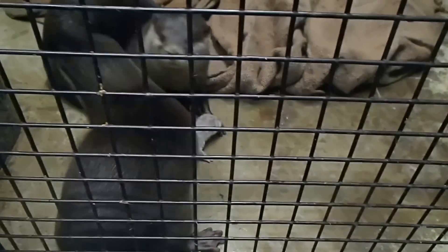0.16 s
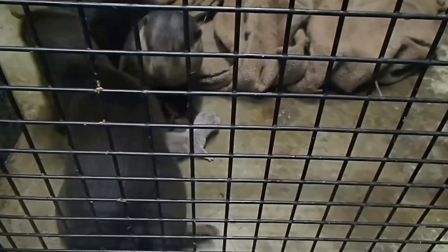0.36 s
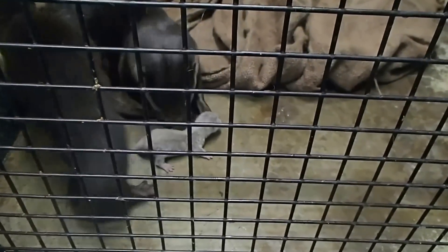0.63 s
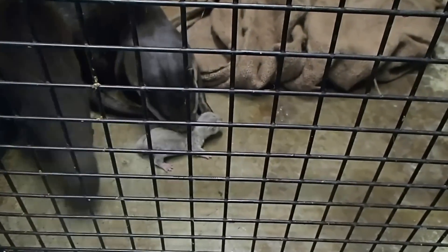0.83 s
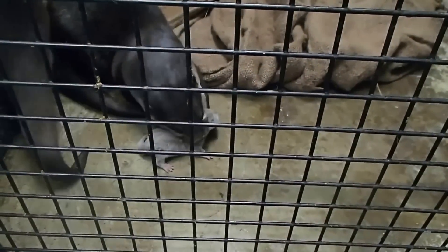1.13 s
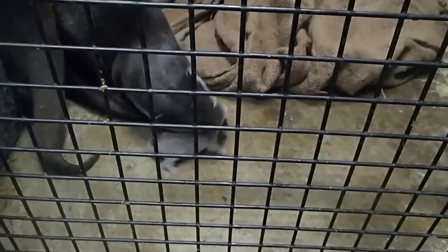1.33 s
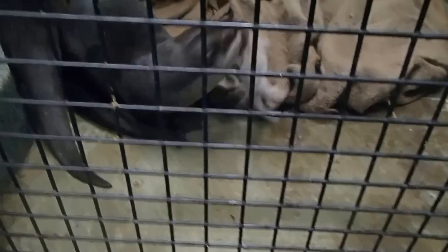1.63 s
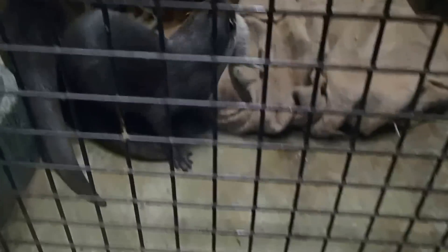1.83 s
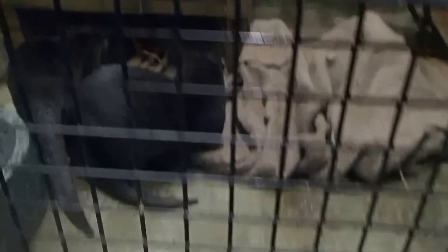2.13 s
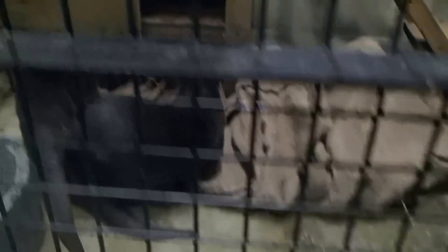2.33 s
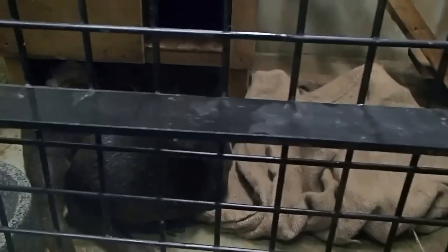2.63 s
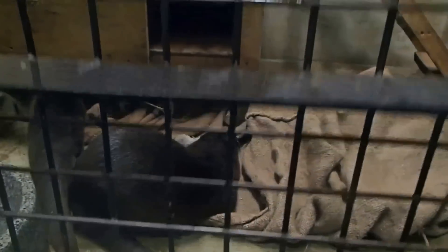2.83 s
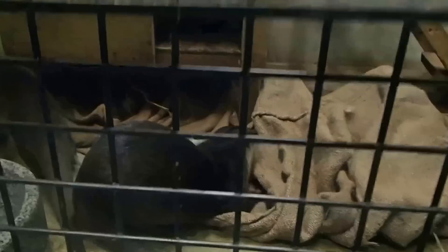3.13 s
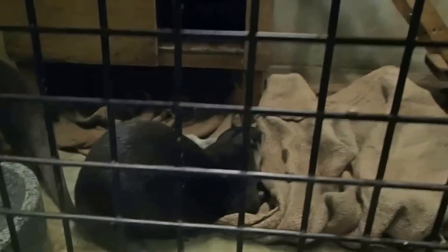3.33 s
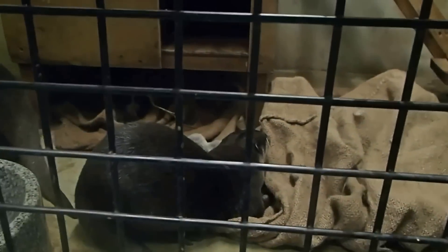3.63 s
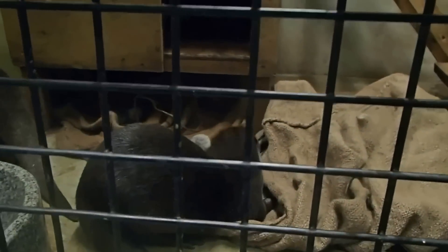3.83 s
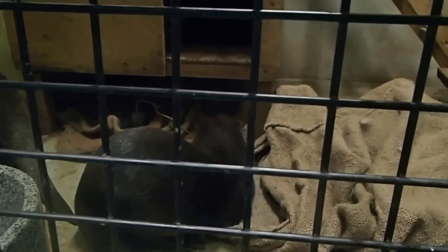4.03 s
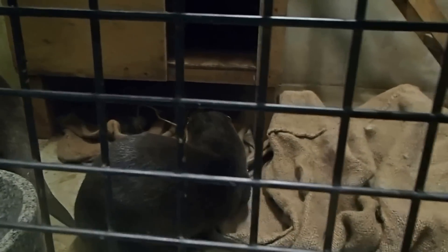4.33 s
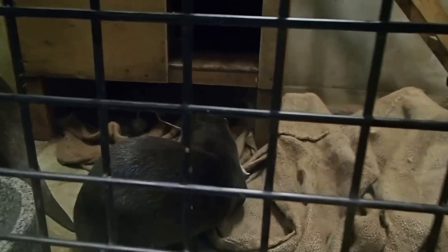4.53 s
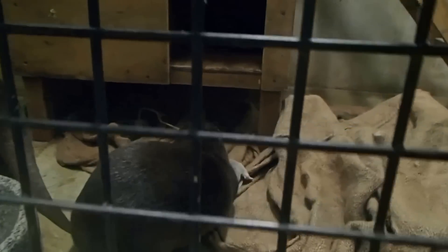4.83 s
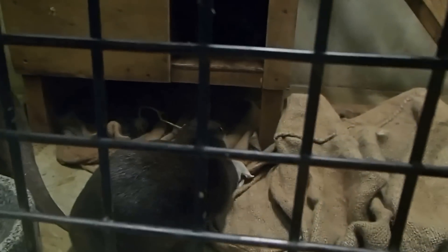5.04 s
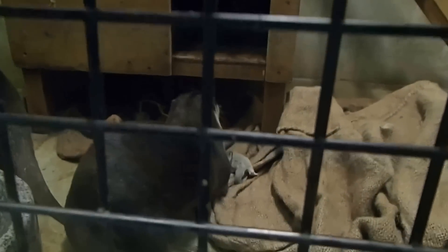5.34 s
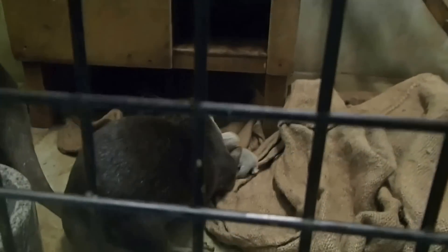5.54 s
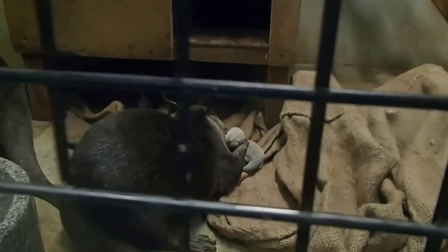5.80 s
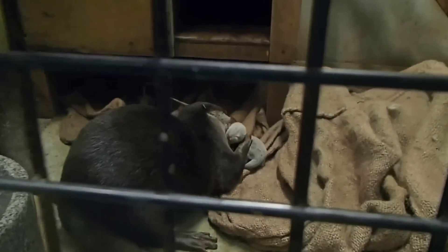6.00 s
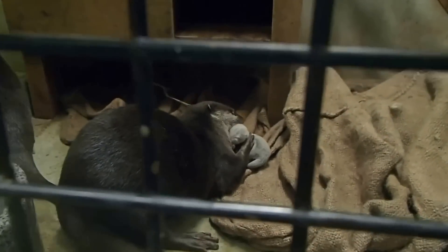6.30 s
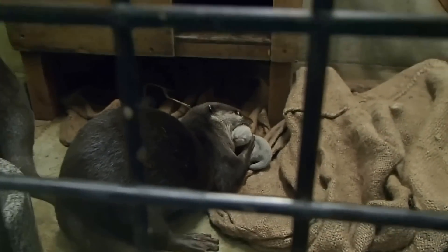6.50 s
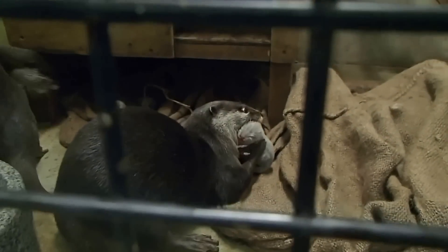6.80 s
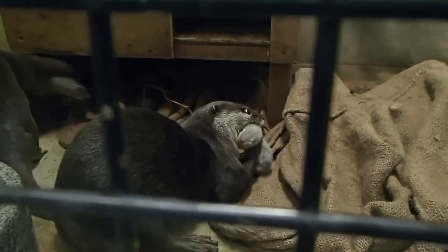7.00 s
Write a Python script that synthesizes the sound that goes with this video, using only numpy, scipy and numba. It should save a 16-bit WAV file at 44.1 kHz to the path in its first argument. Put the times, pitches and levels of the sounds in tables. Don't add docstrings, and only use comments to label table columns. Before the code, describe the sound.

Otters squeal in shrill, breaking whistles and reedy wails in a small concrete den, while a metal gate squeaks, clicks and slams with a rattle.

```python
import sys
import numpy as np
from scipy import signal
from scipy.fft import rfft, irfft, next_fast_len
from scipy.io import wavfile
from scipy.ndimage import uniform_filter1d, minimum_filter1d
from numba import njit

SR = 44100
rng = np.random.default_rng(int(sys.argv[2]) if len(sys.argv) > 2 else 0)


def natural_amplitude(level_db):
    exponent = np.asarray(level_db, float) / 20
    return 10 ** exponent


def transcribe(u):
    v = np.clip(np.atleast_2d(u).T, -1, 1)
    q = np.round(v * 32767).astype(np.int16)
    wavfile.write(sys.argv[1], SR, q)


N = 315756
TIME_S = np.arange(N) / SR

# freq_hz, level_db
VENT_SPECTRUM = [(24, -37), (40, -4), (138, 1.5), (210, -4.5), (387, -1), (549, -8.5), (780, -4),
                 (1050, -10.5), (1870, -10), (2600, -11), (3380, -63), (5720, -120)]
# freq_hz, level_db
MOTOR_HUM = [(61, -57), (134.6, -54)]

# start_s, length_s, pitch_hz, level_db
HINGE_SQUEAKS = [
    (2.088, 0.094, 2236, -33),
    (2.126, 0.068, 3070, -31),
    (2.134, 0.11, 2694, -33.5),
    (5.336, 0.018, 740, -41),
]
# start_s, level_db, tilt_db_per_octave
GATE_BLOWS = [
    (2.298, -26, -6.5),
    (2.632, -9, -0.5),
    (2.648, -23, -6),
    (2.685, -12, -3),
    (2.711, -12, -5),
    (2.742, -21, -7.5),
]
# freq_hz, level_db, t60_s
GATE_MODES = [(47.8, -23, 1.4), (61.65, -13, 2.2), (113.25, -8, 1.8), (183, -12.5, 1.55),
              (284.4, -7.5, 0.57), (396.8, -7, 1), (550, -9.5, 0.57), (590, -7, 0.45), (718, -2, 0.38),
              (899, -1.5, 0.35), (1240, -3, 0.5), (1760, -10, 0.37), (2060, -12, 0.27), (2390, -16, 0.27)]
# freq_hz, level_db
CRACK_SPECTRUM = [(24, -41), (40, -54), (201, -15), (275, -13), (326, -11), (538, -2.5), (623, -5.5),
                  (2440, -6.5), (6000, -17.5), (7800, -88), (13200, -120)]

# freq_hz, level_db
CHEST = [(800, -21), (1400, 2), (2200, -1), (3300, 12), (4300, 5), (5200, 4)]
# freq_hz, level_db
MOUTH = [(3800, -21.5), (5000, -5), (6400, 4.5), (7800, -2.5), (9200, -1), (11300, 6), (13000, -3.5),
         (15500, -10.5)]
# freq_hz, level_db
PIPE = [(2000, -30), (4000, -15), (5300, 3), (6200, -3), (7200, 1.5), (8000, -3), (9000, -2.5)]

# time_s, level_db, brightness_above_9khz_db
LITTER_LEVELS = [(0, -25, -2), (0.22, -27.5, -3.5), (0.42, -31.5, -6), (0.56, -20, 13), (0.71, -28, 22),
                 (0.85, -25.5, 11), (1.2, -25.5, -3), (1.5, -24.5, 0.5), (1.95, -27.5, 4),
                 (2.5, -23.5, -1.5), (3.45, -20, 3.5), (4.8, -28, 4.5), (5.45, -22.5, 2.5), (5.65, -34, -4),
                 (5.899, -21.5, 3.5), (6.38, -35.5, 24), (6.7, -25, -0.5), (7.16, -27.5, 0)]
# centre_s, half_width_s, change_db
LITTER_SURGES = [(0.72, 0.037, 11), (5.5, 0.075, -3), (5.53, 0.068, -2), (4, 0.056, -4), (6.73, 0.03, 9),
                 (2.73, 0.08, -0.5), (3.8, 0.042, 3), (3.03, 0.047, -13), (1.42, 0.034, -4),
                 (1.831, 0.053, -18.5), (1.36, 0.055, 2), (2.244, 0.096, 6.5), (2.36, 0.024, -1),
                 (2.3, .06, -5), (4.4, 0.03, 1), (4.31, 0.016, -5), (5.022, 0.036, 4.5), (6.85, 0.035, -6),
                 (0.35, 0.077, -2.5), (1.25, 0.052, -15), (6.6, .05, -12), (6.96, 0.039, -18),
                 (3.9, 0.048, -6)]

# time_s, pitch_hz, low_partials_db
SOBS = [
    [(0.0, 1105, -37), (0.06, 970, -40.5), (0.08, 893, -39.5), (0.108, 900, -39.5), (0.142, 826, -43.5),
     (0.17, 676, -41)],
    [(0.545, 1778, -40), (0.575, 1667, -43.5), (0.6, 1550, -44.5), (0.625, 1483, -43.5),
     (0.648, 1438, -43.5), (0.665, 1570, -35), (0.68, 1770, -46)],
    [(.66, 1658, -45), (.7, 1725, -40), (.75, 1590, -44)],
    [(0.735, 1635, -46), (0.759, 1356, -39.5), (0.849, 1092, -39.5), (0.999, 1028, -42.5),
     (1.087, 850, -45.5), (1.135, 899, -39.5)],
    [(2.35, 1590, -36.5), (2.42, 1680, -44), (2.465, 1760, -39), (2.5, 1396, -36.5), (2.53, 1760, -34.5),
     (2.582, 1425, -39), (2.596, 1660, -34), (2.632, 1780, -35)],
    [(4.36, 1795, -42), (4.4, 1342, -52.5), (4.44, 1290, -49), (4.48, 1300, -46), (4.51, 1113, -50.5),
     (4.56, 1008, -48), (4.645, 888, -50)],
    [(5.07, 1705, -41), (5.11, 1545, -46), (5.15, 1555, -45.5), (5.17, 1601, -46), (5.2, 1450, -49.5),
     (5.228, 1617, -47.5), (5.25, 1515, -48), (5.284, 1790, -50)],
    [(5.276, 1783, -41), (5.31, 1564, -51), (5.335, 1460, -47), (5.378, 1442, -47.5), (5.397, 1510, -50.5),
     (5.436, 1295, -52)],
    [(5.891, 2010, -39), (5.931, 1468, -40.5), (5.971, 1436, -39), (5.985, 1288, -37), (6.039, 1062, -39),
     (6.2, 901, -41)],
    [(6.1, 1760, -46), (6.16, 1690, -51), (6.232, 1597, -44.5), (6.247, 1480, -47), (6.28, 1463, -46.5),
     (6.304, 1547, -43.5), (6.316, 1408, -47), (6.365, 1395, -47), (6.46, 1298, -46)],
    [(6.555, 2136, -39), (6.598, 1480, -39.5), (6.622, 1594, -37.5), (6.648, 1403, -43), (6.68, 1203, -43),
     (6.72, 987, -41)],
]
# upper_over_lower_db, first_partial_db, upper_mouth_lift_db
SOB_VOICES = [(15.5, -7, .1), (16.7, -27, 1), (18.2, -21, -1.8), (14.7, -12, 3.3), (6.1, -6, -6),
              (19.6, 3, -4.5), (22.12, 5, 5.5), (21.97, 3, 1), (12.4, -9, -0.7), (13.6, 4, -9),
              (16.5, -23, 9)]
SOB_JITTER = (.005, .006, .07, .005, .016, .011, .005, .005, .012, .013, .005)
# start_s, length_s, from_hz, to_hz, low_partials_db
FACING_WAILS = [
    (3.0, 0.25, 1438, 1385, -54.5),
    (3.37, 0.39, 1864, 1031, -50),
    (4.2, 0.13, 1414, 1535, -55.5),
]
# start_s, length_s, from_hz, to_hz, low_partials_db
SIDE_WAILS = [(4.9, 0.095, 1200, 910, -62), (.982, 0.17, 1284, 1673, -47), (2.0, 0.32, 1850, 1290, -45.5),
              (3.085, 0.2, 1900, 1328, -44), (3.52, 0.33, 1890, 1556, -44.5), (3.77, 0.3, 1740, 1398, -46),
              (3.781, 0.11, 1108, 1250, -41), (4.6, 0.35, 1910, 1334, -48.5)]
# start_s, length_s, from_hz, to_hz, low_partials_db
AWAY_WAILS = [(.21, .08, 1500, 1650, -45), (0.37, .08, 1550, 1000, -54), (.42, 0.083, 1900, 1560, -53),
              (1.431, 0.17, 1558, 1590, -39.5), (1.49, 0.09, 1778, 1900, -38), (1.59, .1, 1640, 1750, -39),
              (2.4, .08, 1245, 1190, -36), (2.44, .09, 1950, 1500, -41.5), (1.8, 0.088, 1900, 2400, -43),
              (5.392, 0.29, 1775, 1230, -42), (1.15, 0.12, 1340, 1370, -48.5),
              (.528, 0.029, 2350, 2040, -37), (4.9, .1, 1350, 1400, -48), (4.5, 0.029, 1700, 2100, -39),
              (5.2, .085, 1800, 1900, -42), (5.83, 0.12, 1100, 930, -48), (7.04, .118, 1900, 1830, -35.5)]

# top_s, top_hz, climb_s, fall_s, level_db
OPEN_ARCHES = [
    (3.0, 8980, 0.055, 0.063, -21),
    (4.65, 9020, 0.048, 0.069, -23),
    (5.25, 8200, 0.033, 0.035, -26),
]
# top_s, top_hz, climb_s, fall_s, level_db
THIN_ARCHES = [(.87, 8450, 0.036, 0.055, -27), (1.594, 8900, 0.065, 0.066, -20),
               (2.17, 8270, 0.07, 0.068, -21.5), (2.055, 8820, 0.048, 0.071, -17.5),
               (2.735, 7910, 0.045, 0.069, -23), (2.83, 8400, 0.043, 0.063, -22.5),
               (3.19, 8000, .065, .09, -19), (3.305, 8770, 0.025, 0.082, -19),
               (4.6, 8380, 0.044, 0.071, -19.5)]
# top_s, top_hz, climb_s, fall_s, level_db
HELD_ARCHES = [
    (2.7, 8710, 0.031, 0.14, -31),
    (4.73, 8410, 0.015, 0.14, -20.5),
    (6.02, 8400, .012, 0.06, -25),
]
# start_s, length_s, from_hz, to_hz, level_db
SLIDES = [(.335, .055, 8800, 8400, -21.5), (.388, 0.038, 7600, 7400, -21), (2.095, 0.014, 3600, 6000, -31),
          (2.93, 0.021, 3200, 5700, -38), (3.4, .02, 4900, 7500, -33), (1.231, 0.013, 8800, 8740, -23),
          (6.86, 0.016, 3000, 7500, -38), (5.664, 0.019, 1500, 2700, -36.5), (2.3, 0.034, 6500, 7000, -26),
          (2.235, 0.027, 6700, 5600, -17.5), (2.11, .11, 5670, 4510, -29.5),
          (1.285, 0.059, 7600, 2500, -43.5), (2.78, 0.065, 6000, 3200, -45),
          (1.404, 0.05, 5060, 5380, -28.5), (1.8, 0.0167, 8500, 2900, -42), (1.712, 0.038, 7800, 1500, -42),
          (3.052, 0.034, 8300, 2400, -45), (4.4, .055, 8000, 8900, -28), (1.54, 0.084, 6370, 5700, -34),
          (2.769, 0.046, 7030, 6910, -18), (3.7, 0.035, 6000, 5700, -22), (3.435, 0.074, 4900, 5200, -30.5),
          (4.082, 0.11, 5600, 1900, -51), (4.885, .07, 5200, 3300, -51), (4.672, 0.029, 6200, 3300, -40),
          (5.1, 0.032, 3200, 1760, -49), (4.6, 0.16, 4900, 1910, -49.5), (5.4, 0.041, 6220, 5980, -22),
          (6.541, 0.03, 3900, 1900, -37.5)]
# start_s, length_s, from_hz, to_hz, level_db
HUMS = [(6.415, 0.084, 1278, 1312, -38), (3.685, 0.083, 1060, 1025, -46.5), (3.885, 0.036, 1356, 1343, -41),
        (6.72, 0.066, 1308, 1310, -46), (6.86, 0.077, 853, 1310, -45.5), (6.935, 0.096, 1298, 1346, -36)]
# time_s, pitch_hz, level_db
BREAKS = [
    [(.262, 5600, -21), (.283, 7900, -30), (.31, 8540, -23.5), (.335, 8640, -22.5), (.35, 8200, -25),
     (.385, 5900, -15)],
    [(.368, 2004, -32), (.38, 3010, -38), (.386, 5020, -19.5), (.4, 6440, -14), (.42, 8260, -20),
     (.452, 8450, -11.5), (.458, 7680, -12), (.478, 6970, -12.5), (.522, 5880, -18)],
    [(1.18, 8100, -30), (1.2, 8600, -26.5), (1.235, 8920, -19.5), (1.252, 8400, -33), (1.265, 7200, -16.5),
     (1.288, 5850, -24)],
    [(1.22, 5600, -37), (1.237, 8500, -31), (1.26, 9180, -29), (1.288, 9000, -26), (1.3, 7700, -23),
     (1.33, 6400, -18), (1.348, 6000, -16.5)],
    [(1.615, 6500, -18), (1.635, 8170, -22), (1.65, 8520, -24), (1.67, 7730, -17.5), (1.695, 6930, -17.5),
     (1.722, 5500, -35)],
    [(1.765, 7900, -25), (1.79, 8600, -24), (1.82, 8750, -22), (1.85, 8320, -21), (1.875, 7130, -18.5),
     (1.905, 5700, -26.5)],
    [(3.948, 8170, -26), (3.98, 8550, -21), (4.02, 8300, -25), (4.03, 7300, -17), (4.055, 6370, -18.5),
     (4.082, 5650, -29)],
    [(3.965, 5800, -17), (3.985, 6870, -20.5), (4.0, 8740, -23), (4.02, 8900, -15), (4.07, 8850, -22)],
    [(4.82, 5400, -28), (4.85, 7700, -23), (4.88, 8200, -21), (4.917, 8100, -20), (4.935, 7200, -16.5),
     (5.0, 5600, -23)],
    [(6.865, 5200, -24), (6.89, 7900, -23), (6.905, 8400, -24), (6.935, 8100, -19), (6.955, 6800, -21),
     (6.985, 5900, -18), (7.015, 5100, -27)],
]
# time_s, pitch_hz, level_db
FURTHER_BREAKS = [
    [(4.013, 6400, -38), (4.03, 8020, -20), (4.07, 8250, -15), (4.105, 8050, -22), (4.115, 7040, -18),
     (4.152, 6520, -18), (4.178, 5750, -27), (4.2, 5660, -23)],
    [(4.285, 5550, -26), (4.302, 6000, -20), (4.333, 5400, -31)],
    [(5.112, 8350, -29), (5.135, 8840, -24), (5.17, 8350, -31), (5.185, 6800, -27), (5.21, 5750, -23)],
    [(5.275, 6500, -22), (5.29, 6300, -20), (5.312, 5300, -25.5), (5.332, 5200, -25)],
    [(5.636, 8590, -19), (5.66, 8560, -16), (5.685, 8450, -20), (5.702, 8270, -17), (5.712, 7530, -18),
     (5.73, 7070, -18), (5.766, 5700, -22)],
    [(5.677, 4600, -25), (5.7, 7030, -28), (5.712, 7850, -28), (5.73, 8160, -20), (5.764, 7950, -24),
     (5.772, 7000, -16), (5.792, 5900, -19), (5.804, 6000, -23), (5.83, 5600, -32)],
    [(6.398, 1960, -34), (6.417, 3410, -34), (6.425, 5100, -19), (6.444, 6900, -12), (6.46, 7840, -17.5),
     (6.485, 8330, -18), (6.505, 7850, -14), (6.534, 6220, -16), (6.543, 5160, -36)],
    [(6.515, 8400, -32), (6.54, 8580, -24.5), (6.6, 8150, -27)],
    [(6.61, 7200, -22), (6.635, 7130, -18), (6.65, 6900, -22.5), (6.665, 6440, -21), (6.678, 6200, -24)],
]
# octave_db, roughness_ratio
BREAK_VOICES = [(-12, 1), (-3.5, 0.88), (-8, 0.84), (-8, 0.92), (-8, 0.48), (-10, 0.77), (0.5, 0.88),
                (-10, 1), (-6, 0.94), (-7, 1.3), (-1, 0.83), (4.5, .7), (-16, 1), (-16, 1), (-5.5, .6),
                (1, 0.78), (-1.5, 0.23), (-20, 0.67), (-16, 0.72)]


def shape(hz, table):
    f, db = np.transpose(table)
    return natural_amplitude(np.interp(np.log(hz + 1), np.log(f), db))


def colour(x, table):
    size = next_fast_len(len(x))
    hz = np.arange(size // 2 + 1) * SR / size
    return irfft(rfft(x, size) * shape(hz, table), size)[:len(x)]


def unit(x):
    return x / np.sqrt(np.mean(x ** 2))


def walk(size, rate_hz):
    k = max(int(SR / rate_hz), 1)
    return unit(uniform_filter1d(uniform_filter1d(rng.standard_normal(size), k), k))


def room(x, t60_s, wet_db, gap_s):
    t = np.arange(SR // 2) / SR
    tail = rng.standard_normal(len(t)) * natural_amplitude(-60 * t / t60_s) * (t > gap_s)
    tail = tail / np.sqrt(np.sum(tail ** 2))
    return x + natural_amplitude(wet_db) * signal.fftconvolve(x, tail)[:N]


def vent():
    hum = sum(natural_amplitude(db + 1.6 * walk(N, 8.7)) * np.sqrt(2) * np.sin(2 * np.pi * hz * TIME_S)
              for hz, db in MOTOR_HUM)
    rumble = unit(colour(rng.standard_normal(N), VENT_SPECTRUM))
    return rumble * natural_amplitude(-28.5 + 0.36 * walk(N, 25.0)) + natural_amplitude(15.5) * hum


def hinge():
    out, slip, waver = np.zeros(N), walk(N, 106), walk(N, 210)
    for start_s, length_s, hz, db in HINGE_SQUEAKS:
        end_s = start_s + length_s
        span = slice(int(start_s * SR), int(end_s * SR))
        t = TIME_S[span]
        edge = np.clip(np.minimum((t - start_s) / 0.0026, (end_s - t) / 0.014), 0, 1)
        phase = 2 * np.pi * hz * np.cumsum(1 + 0.021 * waver[span]) / SR
        out[span] += natural_amplitude(db + 2.0 * slip[span]) * edge * np.sin(phase)
    return out


def gate():
    out, t = np.zeros(N + SR), np.arange(SR) / SR
    boom_spectrum = [(45, -16), (110, -8.5), (300, -1.0), (600, -34)]
    for start_s, db, tilt_db in GATE_BLOWS:
        tilt = [(150, -1.6 * tilt_db), (500, 0.008), (8000, 4 * tilt_db)]
        crack = unit(colour(rng.standard_normal(SR), CRACK_SPECTRUM)) * natural_amplitude(-60 * t / 0.22)
        boom = natural_amplitude(-23.0) * unit(colour(rng.standard_normal(SR), boom_spectrum)) * natural_amplitude(-60 * t / 1.28)
        rings = sum(natural_amplitude(mode_db - 7.0) * np.sin(2 * np.pi * (hz * t + rng.random())) * natural_amplitude(-60 * t / t60_s)
                    for hz, mode_db, t60_s in GATE_MODES)
        blow = colour(crack + 0.43 * rings + boom, tilt)
        start = int(start_s * SR)
        out[start:start + SR] += natural_amplitude(db) * blow * np.minimum(3 - 3 * t, 1)
    return out[:N]


def litter():
    reeds, leaks = np.zeros(N), np.zeros(N)
    turn = 2 * np.pi * np.arange(4096) / 4096
    wave = sum(np.cos(k * turn + k * k) for k in range(1, 13))
    for top_hz, cries_per_s in ((1500, 2.3), (1750, 3.1), (1950, 2.7)):
        age = (np.cumsum(cries_per_s * natural_amplitude(3 * walk(N, 2))) / SR + rng.random()) % 1
        pitch_hz = top_hz * natural_amplitude(-4.5 * age ** .6 + .5 * walk(N, 30)) * (1 + .0095 * walk(N, 700))
        cycle = np.cumsum(pitch_hz) / SR % 1
        effort = natural_amplitude(2.5 * walk(N, 14)) * (.6 + np.sin(np.pi * age))
        reeds += effort * wave[(cycle * 4096).astype(int)] / 3
        leaks += effort * (1 + np.cos(2 * np.pi * cycle)) * rng.standard_normal(N)
    s, db, bright_db = np.transpose(LITTER_LEVELS)
    mouth = colour(reeds + .35 * leaks, MOUTH)
    throat = colour(mouth, [(8700, 0), (9300, -6), (9900, -40)])
    chest = natural_amplitude(-18) * unit(colour(reeds + .9 * leaks, CHEST + [(6500, -50)]))
    upper = natural_amplitude(np.minimum(np.interp(TIME_S, s, bright_db), 5)) * unit(mouth - throat)
    surge_db = sum(change_db * np.exp(-((TIME_S - centre_s) / width_s) ** 2)
                   for centre_s, width_s, change_db in LITTER_SURGES)
    return natural_amplitude(np.interp(TIME_S, s, db) + surge_db) * (unit(throat) + upper + chest)


def cry(rows, jitter, tremor, fade_s, smooth_samples):
    s, hz, db = np.transpose(rows)
    span = slice(int(s[0] * SR), min(int(s[-1] * SR), N))
    t = TIME_S[span]
    pitch_hz = uniform_filter1d(np.interp(t, s, hz), size=smooth_samples, mode="nearest")
    pitch_hz = pitch_hz * (1 + jitter * walk(len(t), 800) + tremor * walk(len(t), 36.1))
    phase = 2 * np.pi * np.cumsum(pitch_hz) / SR
    edge = np.clip(np.minimum(t - s[0], s[-1] - t) / fade_s, 0, 1)
    return span, pitch_hz, phase, natural_amplitude(np.interp(t, s, db)) * edge * np.sqrt(2)


def glide(start_s, length_s, from_hz, to_hz, db):
    age = np.linspace(0, 1, num=16)
    curve = .6 if to_hz < from_hz else 1.6
    hz = from_hz * (to_hz / from_hz) ** age ** curve
    return np.transpose([start_s + length_s * age, hz, db - 3 * age])


def wail_cries():
    sobs = [(rows, *voice, jitter) for rows, voice, jitter in zip(SOBS, SOB_VOICES, SOB_JITTER)]
    kinds = [(FACING_WAILS, 23.5), (SIDE_WAILS, 9.5), (AWAY_WAILS, 5)]
    crowd = [(glide(*row), bright_db, 3, 0, .01) for table, bright_db in kinds for row in table]
    return sobs + crowd


def wails():
    out, breath, order = np.zeros(N), np.zeros(N), np.arange(1, 19)[:, None]
    for rows, bright_db, first_db, lift_db, jitter in wail_cries():
        span, pitch_hz, phase, gain = cry(rows, jitter, tremor=.006, fade_s=.012, smooth_samples=500)
        hz = order * pitch_hz
        low = shape(hz, CHEST) * (hz < 5200)
        low[0] *= natural_amplitude(first_db)
        high = shape(hz, MOUTH) * (hz < 17000)
        high *= shape(hz, [(7500, 0), (9500, lift_db)])
        low = low / np.sqrt(np.sum(low ** 2, axis=0))
        high = high / np.sqrt(np.sum(high ** 2, axis=0))
        partials = low + natural_amplitude(bright_db + 3.5) * high
        shimmer = np.array([walk(len(pitch_hz), 110) for _ in order])
        stack = partials * natural_amplitude(3.8 * shimmer) * np.sin(order * phase + order ** 2)
        out[span] += gain * np.sum(stack, axis=0)
        breath[span] += gain * natural_amplitude(bright_db) * (1 + np.cos(phase)) * rng.standard_normal(len(pitch_hz))
    return out + natural_amplitude(-10) * colour(breath, MOUTH)


def arch(top_s, top_hz, climb_s, fall_s, db, held):
    foot_hz, end_hz, sag_hz = 5500, 6000, 244.5
    up = np.linspace(1.04, 0, num=12)
    down = np.linspace(0, 1.06, num=16)[1:]
    climb_hz, climb_db, hold = (450, 3, 0.38) if held else (top_hz - foot_hz, -11, 0.22)
    slack = np.maximum(down - hold, 0) / (1 - hold)
    fall_hz = sag_hz * down + (top_hz - end_hz - sag_hz) * slack ** 1.25
    hz = top_hz - np.r_[climb_hz * up ** 3.4, fall_hz]
    effort_db = db + np.r_[climb_db * up, 0 * down] + 20 * np.log10(shape(hz, PIPE))
    return np.transpose([top_s + np.r_[-climb_s * up, fall_s * down], hz, effort_db])


def whistle_cries():
    breaks = [(rows, *voice) for rows, voice in zip(BREAKS + FURTHER_BREAKS, BREAK_VOICES)]
    arch_kinds = [(OPEN_ARCHES, False, -3), (THIN_ARCHES, False, -11), (HELD_ARCHES, True, -11)]
    arches = [(arch(*row, held), octave_db, 1) for table, held, octave_db in arch_kinds for row in table]
    glide_kinds = [(SLIDES, -13), (HUMS, -11)]
    glides = [(glide(*row), octave_db, 1) for table, octave_db in glide_kinds for row in table]
    return breaks + arches + glides


def whistles():
    out = np.zeros(N)
    for rows, octave_db, rough in whistle_cries():
        span, pitch_hz, phase, gain = cry(rows, jitter=.006, tremor=.004, fade_s=.004, smooth_samples=200)
        size = len(pitch_hz)
        hoarse = rough * np.linspace(.05, .8, size) * walk(size, 1400)
        flutter_db = 2.84 * rough * np.minimum(pitch_hz / 4000, 1) * walk(size, 190)
        octave = natural_amplitude(octave_db) * np.clip((19000 - 2 * pitch_hz) / 1500, 0, 1) * np.sin(2 * phase)
        out[span] += gain * natural_amplitude(flutter_db) * (1 + hoarse) * (np.sin(phase) + octave)
    return out


@njit
def follow(x, attack, release):
    y, e = np.empty(len(x)), .1
    for i in range(len(x)):
        e += (abs(x[i]) - e) * (attack if abs(x[i]) > e else release)
        y[i] = e
    return y


def scene():
    air = vent()
    hall = room(gate() + hinge(), t60_s=0.72, wet_db=-5.0, gap_s=0.00159)
    far = room(litter(), t60_s=0.051, wet_db=-3.5, gap_s=0.0035)
    reedy = room(wails(), t60_s=0.056, wet_db=-2.0, gap_s=0.0082)
    high = room(whistles(), t60_s=0.2, wet_db=-4.0, gap_s=0.0014)
    loud = follow(high + 2.4 * reedy + 3.7 * hall, 1 / (0.0061 * SR), 1 / (.09 * SR))
    duck = (1 + loud / natural_amplitude(-19.0)) ** -1.2
    sustained = follow(high + reedy + duck * far, 1 / (0.042 * SR), 1 / (.35 * SR))
    slow = (1 + sustained / natural_amplitude(-19.0)) ** -1.8
    mix = high + reedy + hall + 2.59 * duck * far + slow * duck ** 0.25 * air
    return np.tile(mix, (2, 1))


def low_pass(x):
    return signal.sosfilt(signal.butter(12, 15850, fs=SR, output="sos"), x)


def record(dry):
    top = signal.ellip(10, .2, 70, 15680, fs=SR, output="sos")
    bottom = signal.butter(4, 42, "high", fs=SR, output="sos")
    x = signal.sosfilt(np.vstack([top, bottom]), dry)
    ceiling = .7
    gain = minimum_filter1d(ceiling / np.maximum(abs(x), ceiling), size=400)
    return low_pass(x * uniform_filter1d(gain, size=200))


dry = scene()
out = record(dry)
transcribe(out)
```